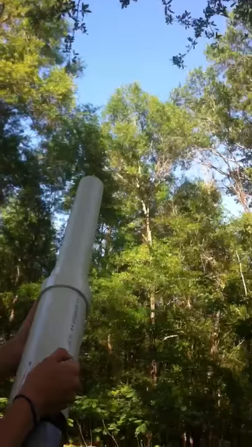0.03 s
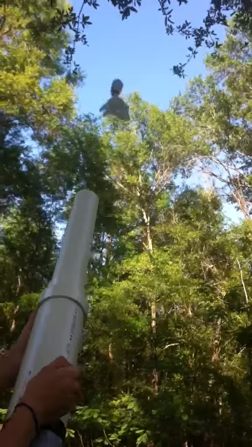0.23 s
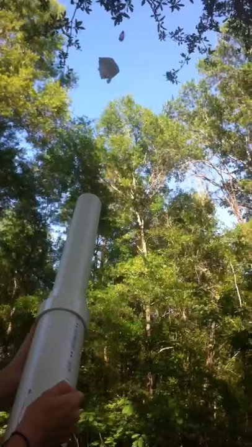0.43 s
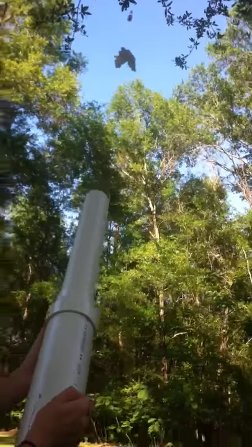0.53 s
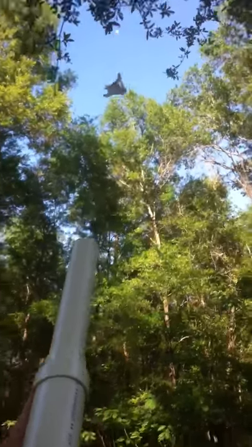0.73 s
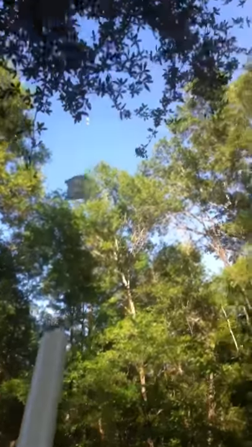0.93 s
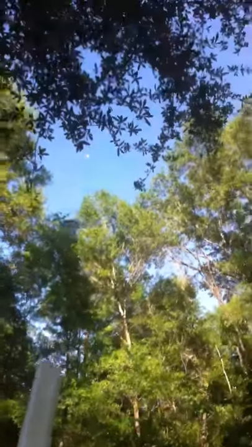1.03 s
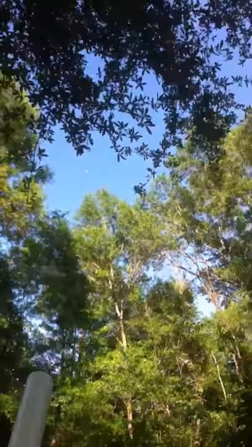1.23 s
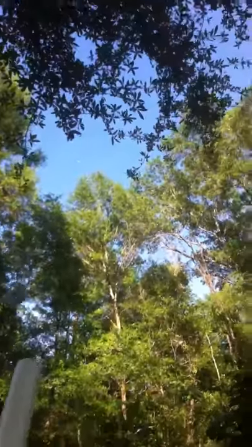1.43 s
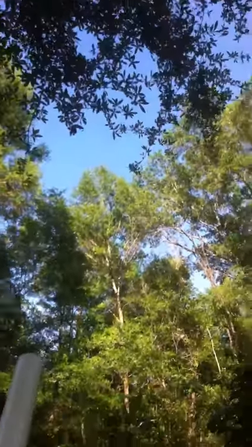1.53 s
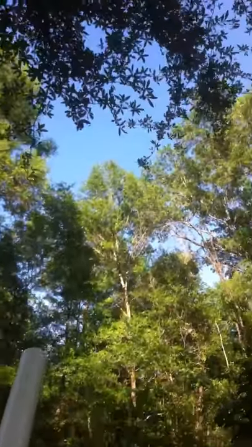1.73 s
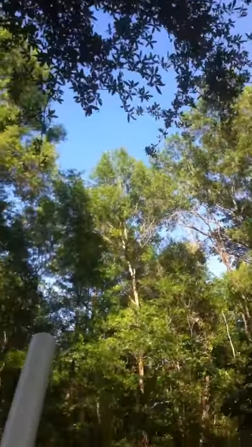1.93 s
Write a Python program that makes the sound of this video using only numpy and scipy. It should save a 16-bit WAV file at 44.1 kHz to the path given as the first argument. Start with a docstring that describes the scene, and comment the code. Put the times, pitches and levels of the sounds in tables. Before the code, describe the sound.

A plastic-pipe gas cannon fires close by, outdoors among trees. After near silence, the igniter snaps sharply at 0.22 seconds, gas hisses from 0.27, and a loud, slightly rounded-off pop cracks at 0.32. The pipe sings a hollow, wavering low tone, sinking and fading by about 0.7. A diffuse mid-range echo decays to the end, with faint ticks and dry leaf crackles around 1.8.

```python
"""A plastic-pipe cannon fires at the edge of a wood: the igniter snaps, burning gas hisses behind the load,
the load pops out, and the hot gas in the pipe sings a wavering tone that sinks as it cools.
Snaps are struck modes, gas is shaped noise with whistles, pops are short swings, the tone is gliding sines.
The trees answer with a long mid-range wash, made by smearing the shot with dying noise.
Small ticks, leaf rustles, knocks, a far whistle, insects and wind puffs, from noise and sines, lie under it."""
import sys
import numpy as np
from scipy import signal
from scipy.fft import rfft, irfft
from scipy.io import wavfile
from scipy.ndimage import uniform_filter1d

SR = 44100
rng = np.random.default_rng(int(sys.argv[2]) if len(sys.argv) > 2 else 0)


def wav_record(signal):
    """Record a signal, one row per channel, as 16-bit PCM in the file named by sys.argv[1]."""
    frames = np.transpose(np.atleast_2d(signal))
    bounded = np.clip(frames, -1, 1)
    # unit amplitude maps onto the largest positive 16-bit level
    quanta = np.round(bounded * 32767).astype(np.int16)
    wavfile.write(sys.argv[1], SR, quanta)


def attenuation_scalar(level_db):
    """Turn a level in dB into a linear amplitude multiplier (20 dB per decade)."""
    decades = np.asarray(level_db, float) / 20
    return 10 ** decades


N = 88200  # samples: two seconds

# In these tables, t60 is the time a sound takes to fall by 60 dB.
# Outdoor hush. Each row: frequency in Hz, relative strength in dB per Hz.
HUSH_COLOUR = [(15, -40), (25, -13), (59, -17), (117, -2.5), (416, -8), (714, -10), (1370, -15.5),
               (2840, -19), (7920, -25.5), (16000, -25.5)]
# Wind on the microphone. Each row: middle in seconds, length in seconds, rms level at the middle in dB.
WIND_PUFFS = [(0.426, 0.3, -56), (0.493, 0.069, -55), (0.579, 0.073, -49.5), (0.717, 0.057, -62),
              (0.806, .08, -64), (1.09, 0.043, -59), (1.331, .05, -68), (1.517, 0.038, -62.5),
              (1.544, 0.03, -58), (1.917, 0.097, -70), (1.98, 0.075, -70)]
# Small dry ticks. Each row: start in seconds, level in dB.
DRY_TICKS = [(0.101, -51), (0.5084, -40), (1.3401, -42.5)]
# Tone colour of the ticks. Each row: frequency in Hz, relative strength in dB per Hz.
DRY_TICK_COLOUR = [(700, -30), (1300, -3), (3700, 0), (8500, -6), (11000, -14), (16000, -22)]
# Dry leaves crushed. Each row: start in seconds, level in dB, t60 in seconds.
LEAF_RUSTLES = [(1.807, -67.5, 0.069), (1.8134, -49, 0.088), (1.83, -66, .6), (1.8706, -54, 0.13),
                (1.893, -56, 0.088), (1.918, -49.5, 0.058), (1.932, -61, 0.34)]
# Tone colour of the leaves. Each row: frequency in Hz, relative strength in dB per Hz.
LEAF_COLOUR = [(590, -42.5), (1000, -24), (1320, -10), (2390, -11.5), (3420, -10.5), (4260, -9),
               (5630, -6.5), (15100, -11), (16000, -19)]
# Short knocks, some before the leaves and most among them.
# Each row: start in seconds, pitch in Hz, number of cycles, rough peak in dB.
KNOCKS = [(1.3392, 1600, 2, -54), (1.7466, 3800, 4, -55), (1.7470, 2900, 4, -59), (1.813, 1750, 7, -50),
          (1.8135, 2400, 8, -52), (1.872, 1350, 5, -57), (1.873, 3400, 8, -56), (1.918, 1360, 5, -55),
          (1.921, 720, 5, -51), (1.94, 320, 9, -58)]
# A thin far whistle. One row: start in seconds, end in seconds, pitch in Hz, peak in dB.
FAR_WHISTLE = (.03, .105, 3262, -64)
# How long the trees ring. Each row: frequency in Hz, t60 in seconds.
TREES_T60 = [(100, .5), (300, .8), (600, 2.5), (1200, 2.81), (2000, 2.2), (3000, 1.7), (4500, 0.94),
             (7000, 1.2), (10000, 0.75), (15000, .25)]
# Tone colour of the trees' echo. Each row: frequency in Hz, relative level in dB.
ECHO_COLOUR = [(100, -15), (290, -9), (420, -16), (650, -9), (1200, -1.5), (1650, -10.5), (2200, -7),
               (3000, -7), (4500, -10.5), (7000, -14.5), (10000, -13.5), (15000, -8)]
# Muzzle blast that sets off the trees' echo; mixed in only through that echo.
# One row: time in seconds, height of its single sample in dB.
MUZZLE_BLAST = (.322, 15.7)
# Press, snap and rebound of the igniter. Each row: time in seconds, peak of the ringing in dB.
IGNITER_HITS = [(.2214, -14), (.2227, 1), (.2246, -22.5)]
# Ringing of the igniter. Each row: frequency in Hz, relative level in dB, t60 in seconds.
IGNITER_RING = [(393, -10.5, 0.037), (670, -8.5, .045), (904, -13, .035), (1470, -16, 0.022),
                (2180, -25, .012), (2797, -7.5, 0.027), (3875, -4.5, 0.015), (5890, 8, 0.012),
                (8530, 0, .007), (9140, -4, 0.0078), (11600, 8.5, 0.0028), (11600, -1, .008),
                (12500, -6.5, 0.0037), (14900, -25, .005)]
# Gas leaking past the load. Each row: time in seconds, level in dB.
GAS_LEVEL = [(0.236, -46.5), (0.248, -47), (0.26, -47), (0.272, -30), (0.292, -23), (0.312, -21),
             (0.34, -33.5), (0.42, -52.5)]
# Tone colour of the gas. Each row: frequency in Hz, relative strength in dB per Hz.
GAS_COLOUR = [(88, -69), (150, -25), (494, -1.5), (689, -23), (871, -5), (1170, -10), (1500, -6),
              (2650, -7), (14500, -6), (16000, -42)]
# Brief whistles in the gas. Each row: middle in seconds, pitch in Hz, length in seconds, peak in dB.
GAS_WHISTLES = [(0.2944, 2160, 0.0024, -20.5), (.304, 1501, 0.004, -15.5), (0.312, 697.5, 0.018, -25)]
# Load striking the pipe wall, then echoes. Each row: time in seconds, peak of the ringing in dB.
WALL_HITS = [(.3214, -9), (.3222, -3), (.3290, -20), (.340, -22), (.3555, -23)]
# Ringing of the pipe wall. Each row: frequency in Hz, relative level in dB, t60 in seconds.
WALL_RING = [(1100, -6, .03), (1430, -8, .015), (2030, -5, .01), (2900, -1, .008), (3400, -3, .008),
             (3900, 1, .008), (4900, -1, .006), (6000, -3, .006), (7500, -7, .005), (9500, -11, .005)]
# Pressure swings at the muzzle. Each row: start in seconds, pitch in Hz, number of cycles, rough peak in dB.
MUZZLE_POPS = [(0.3151, 420, 1.83, -5), (.3188, 626, 1.4, -4), (0.3214, 2054, 4.5, -3.5),
               (0.3237, 330, 1.2, -9.5), (0.328, 2100, 2.5, -14), (.3308, 900, 1.5, -13),
               (0.3309, 330, 1.5, -10)]
# Main tone of the gas column. Each row: time in seconds, pitch in Hz, rms level in dB.
COLUMN_TONE = [(0.337, 300.3, -18), (0.369, 306.3, -19), (0.431, 281.3, -17.5), (0.469, 267.1, -20.5),
               (0.523, 285.3, -21.5), (0.529, 280.7, -19.5), (0.559, 252.3, -30), (0.599, 236.3, -35.5),
               (0.717, 219.1, -49), (1.039, 190, -70), (1.05, 188, -67)]
# Swell of the third harmonic. One row: middle in seconds, half length in seconds, peak in dB.
THIRD_HARMONIC = (.455, .035, -29.5)
# Other pipe modes. Each row: frequency in Hz, starting level in dB, t60 in seconds.
PIPE_MODES = [(160, -40.5, 0.48), (290, -35.5, 1.2), (388, -21, 0.16), (442, -29.5, 0.29), (491.5, -19, .3),
              (612, -26, 0.13), (619, -16, .35), (821, -27.5, 0.34), (928, -18.5, 0.21), (1055, -28.5, .12)]
# Share of the tone's pitch change, one number for each pipe mode: 0 stays put, 1 follows fully.
PITCH_SHARES = [.5, 0, 0, 0, 1, 0, 0, 0, .15, 0]

HUSH_DB, INSECT_DB = -65.5, -78  # rms, before the dip
INSECT_HZ, INSECT_WIDTH_HZ = 7900, 900
DIP_S, DIP_DB, DIP_RETURN_S = 0.32, -7, 1.1  # the hush drops at the blast and creeps back
PUFF_HZ, PUFF_WIDTH_HZ = 140, 100
TICK_T60_S, CRACKLE_PER_S = 0.01, 1300
TREES_DB, TREES_DELAY_S, TREES_BUILD_S = -8.5, 0.0028, 0.21
BACK_SHARE = 0.23  # part of the cannon's direct sound that reaches the trees
STRIKE_SPREAD_DB = 1.5  # how much each mode differs from hit to hit
SNAP_DB, SNAP_T60_S, SNAP_LOW_HZ = -10.02, 0.008, 300  # crack: noise rms against the ringing's peak
SECOND_DB = -29.5  # second harmonic against the main tone
MODES_START_S, MODES_RISE_S = 0.325, 0.04
WAVER_DB, REFERENCE_HZ = 2.5, 305  # modes have their listed pitch when the tone is at REFERENCE_HZ
MIC_LOW_HZ, PEAK_LIMIT = 50, 1.1


def evened(x):
    """Scales a sound to an rms of one."""
    return x / np.sqrt(np.mean(x ** 2) + 1e-20)


def read(points, hz):
    """Reads between table rows, with frequency on a log scale."""
    f, value = np.transpose(points)
    return np.interp(np.log(hz + 1), np.log(f + 1), value)


def add(mix, s, sound):
    """Mixes a sound in at s seconds."""
    part = mix[round(s * SR):][:len(sound)]
    part += sound[:len(part)]


def coloured(x, points):
    """Shapes the spectrum of x by a table, at an rms of one."""
    gain = attenuation_scalar(read(points, np.fft.rfftfreq(len(x), 1 / SR)))
    return evened(irfft(rfft(x) * gain, len(x)))


def band(hz, width_hz):
    """Sends noise through the same resonance twice, leaving a narrow band."""
    r = np.exp(-np.pi * width_hz / SR)
    poles = [1, -2 * r * np.cos(2 * np.pi * hz / SR), r * r]
    once = signal.lfilter([1, 0, -1], poles, rng.standard_normal(N))
    return evened(signal.lfilter([1], poles, once))


def bursts(t, rows, noise):
    """Opens noise almost at once at each time, then lets it die away."""
    gain = np.zeros(N)
    for s, db, t60 in rows:
        opening = np.clip((t - s) / 0.0006, 0, 1)
        gain += attenuation_scalar(db - 60 * np.maximum(t - s, 0) / t60) * opening
    return noise * gain


def swings(rows):
    """Makes short runs of pressure cycles, each under a soft arch."""
    out = np.zeros(N)
    for s, hz, cycles, db in rows:
        u = np.arange(0, cycles / hz, 1 / SR) * hz  # cycles so far
        arch = np.sin(np.pi * u / cycles) ** 0.6
        add(out, s, attenuation_scalar(db) * arch * np.sin(2 * np.pi * u))
    return out


def struck(hits, modes):
    """Every hit cracks and rings the same modes, a little differently each time."""
    out, t = np.zeros(N), np.arange(3000) / SR
    hz, db, t60 = np.transpose(modes)[:, :, None]
    for s, peak_db in hits:
        spread = STRIKE_SPREAD_DB * rng.standard_normal((len(modes), 1))
        ring = (attenuation_scalar(db + spread - 60 * t / t60) * np.sin(2 * np.pi * hz * t)).sum(0)
        crack = attenuation_scalar(SNAP_DB - 60 * t / SNAP_T60_S) * rng.standard_normal(len(t))
        add(out, s, attenuation_scalar(peak_db) * (ring / abs(ring).max() + crack))
    return signal.lfilter(*signal.butter(4, SNAP_LOW_HZ, "high", fs=SR), out)


def hush(t):
    """Outdoor noise and a band of insects, which dip together and slowly return."""
    air = attenuation_scalar(HUSH_DB) * coloured(rng.standard_normal(N), HUSH_COLOUR)
    insects = attenuation_scalar(INSECT_DB) * band(INSECT_HZ, INSECT_WIDTH_HZ)
    dip = attenuation_scalar(DIP_DB * (t > DIP_S) * np.exp(-((t - DIP_S) / DIP_RETURN_S) ** 2))
    return dip * (air + insects)


def wind(t):
    """Puffs of wind on the microphone: low noise that swells and sinks."""
    swell = sum(attenuation_scalar(db) * np.exp(-2 * (2 * (t - s) / length) ** 2) for s, length, db in WIND_PUFFS)
    return swell * band(PUFF_HZ, PUFF_WIDTH_HZ)


def far_whistle(t):
    """A thin steady sine that fades in and stops quickly."""
    start, end, hz, db = FAR_WHISTLE
    fade = np.clip((t - start) / 0.04, 0, 1) * np.clip((end - t) / 0.006, 0, 1)
    return attenuation_scalar(db) * fade * np.sin(2 * np.pi * hz * t)


def ticks(t):
    """Small dry ticks: very short bursts of noise."""
    rows = [(s, db, TICK_T60_S) for s, db in DRY_TICKS]
    return bursts(t, rows, coloured(rng.standard_normal(N), DRY_TICK_COLOUR))


def leaves(t):
    """Crushed dry leaves: noise with stronger grains strewn in it."""
    grains = rng.standard_normal(N) * (1 + 1.5 * (rng.random(N) < CRACKLE_PER_S / SR))
    return bursts(t, LEAF_RUSTLES, coloured(grains, LEAF_COLOUR))


def knocks():
    """Short knocks, each a few cycles of one pitch."""
    return swings(KNOCKS)


def trees(cannon):
    """Scattered echo from trunks and leaves: it builds up, then each band dies at its own speed."""
    sent = BACK_SHARE * cannon
    s, db = MUZZLE_BLAST
    add(sent, s, attenuation_scalar(db) * np.ones(1))
    hz, t, z = signal.stft(rng.standard_normal(N), SR, nperseg=256)
    fall = attenuation_scalar(read(ECHO_COLOUR, hz)[:, None] - 60 * t / read(TREES_T60, hz)[:, None])
    build = 1 - 0.42 * np.exp(-t / TREES_BUILD_S)
    tail = signal.istft(z * fall * build, SR, nperseg=256)[1]
    tail = np.concatenate([np.zeros(round(TREES_DELAY_S * SR)), tail / np.sqrt(SR / 20)])
    return attenuation_scalar(TREES_DB) * signal.fftconvolve(sent, tail)[:N]


def igniter():
    """The igniter is pressed, snaps and rebounds, ringing at its own modes."""
    return struck(IGNITER_HITS, IGNITER_RING)


def rush(t):
    """Gas leaking past the load: hiss that swells, then fades, with short whistles in it."""
    s, db = np.transpose(GAS_LEVEL)
    level = attenuation_scalar(np.interp(t, s, db, db[0], -120))
    opening = np.clip((t - s[0]) / 0.0081 + 1, 0, 1)
    out = coloured(rng.standard_normal(N), GAS_COLOUR) * level * opening
    for middle, hz, length, peak_db in GAS_WHISTLES:
        swell = np.exp(-(2 * (t - middle) / length) ** 2)
        out += attenuation_scalar(peak_db) * swell * np.sin(2 * np.pi * (hz * t + rng.random()))
    return out


def wall():
    """The load strikes the pipe wall, which cracks and rings; fainter echoes follow."""
    return struck(WALL_HITS, WALL_RING)


def pops():
    """The load leaves the muzzle and the air pressure swings a few times."""
    return swings(MUZZLE_POPS)


def pipe_modes(t, pitch):
    """Other modes of the pipe waver and die away; some follow the tone's pitch."""
    out, age = np.zeros(N), np.maximum(t - MODES_START_S, 0)
    rise = np.sin(np.pi / 2 * np.minimum(age / MODES_RISE_S, 1))
    for (hz, start_db, t60), share in zip(PIPE_MODES, PITCH_SHARES):
        turns = np.cumsum(hz * (pitch / REFERENCE_HZ) ** share) / SR + rng.random()
        waver_hz = rng.uniform(7.9, 21)
        waver = WAVER_DB * np.sin(2 * np.pi * (waver_hz * t + rng.random()))
        out += rise * attenuation_scalar(start_db + waver - 60 * age / t60) * np.sin(2 * np.pi * turns)
    return out


def column(t):
    """Hot gas sings in the pipe: a gliding tone with two harmonics, plus the other modes."""
    s, hz, db = np.transpose(COLUMN_TONE)
    pitch = np.interp(t, s, hz)
    angle = 2 * np.pi * np.cumsum(pitch) / SR
    fade = np.clip((t - s[0]) / 0.005 + 1, 0, 1) * np.clip((s[-1] - t) / 0.046, 0, 1)
    level = attenuation_scalar(uniform_filter1d(np.interp(t, s, db), size=300))
    tone = np.sqrt(2) * fade * level * (np.sin(angle) + attenuation_scalar(SECOND_DB) * np.sin(2 * angle))
    middle, half, third_db = THIRD_HARMONIC
    third = attenuation_scalar(third_db) * np.exp(-((t - middle) / half) ** 2) * np.sin(3 * angle)
    return tone + third + pipe_modes(t, pitch)


def scene():
    """Cannon and its echo over the quiet wood."""
    t = np.arange(N) / SR
    cannon = igniter() + rush(t) + wall() + pops() + column(t)
    small_sounds = far_whistle(t) + ticks(t) + leaves(t) + knocks()
    return (cannon + trees(cannon) + small_sounds + hush(t) + wind(t))[None]


def band_limit(x):
    """A steep low-pass at the top of the band."""
    return signal.sosfilt(signal.butter(12, 17090, fs=SR, output="sos"), x)


def record(dry):
    """The microphone drops the deepest bass and the input stage rounds off the highest peaks."""
    thin = signal.lfilter(*signal.butter(2, MIC_LOW_HZ, "high", fs=SR), dry)
    rounded = PEAK_LIMIT * np.tanh(thin / PEAK_LIMIT)
    return band_limit(rounded)


dry = scene()
out = record(dry)
wav_record(out)
```